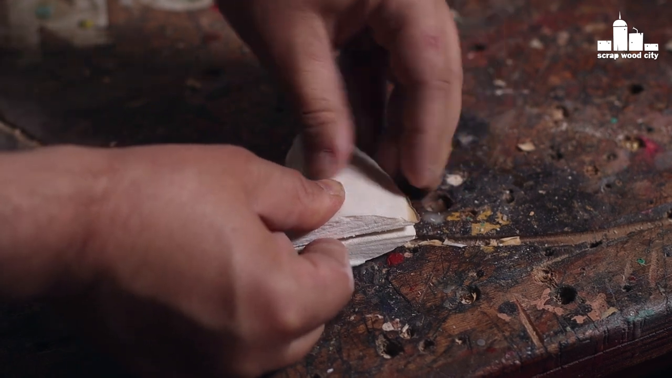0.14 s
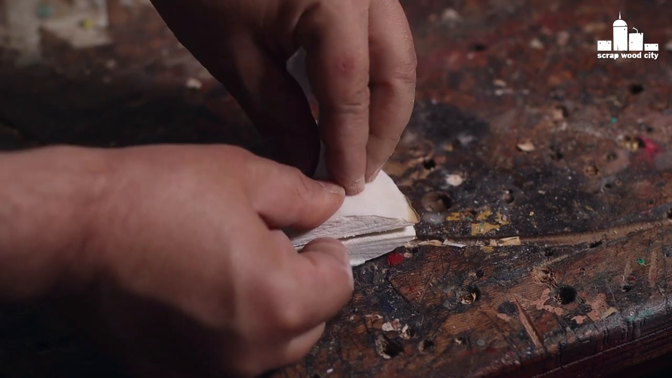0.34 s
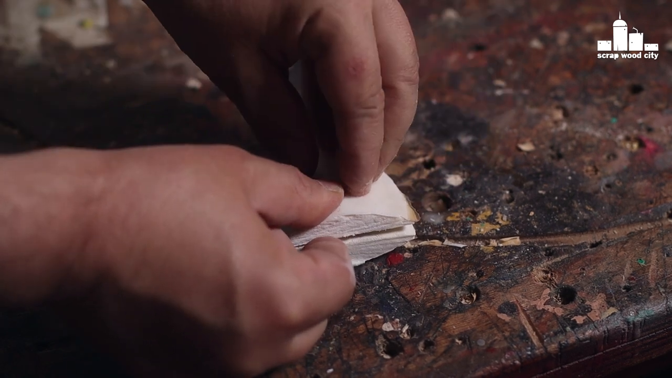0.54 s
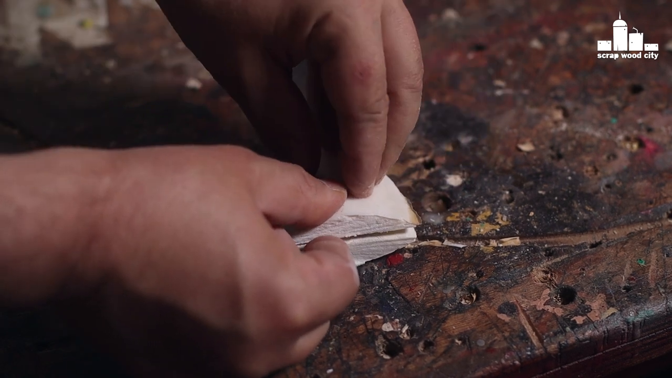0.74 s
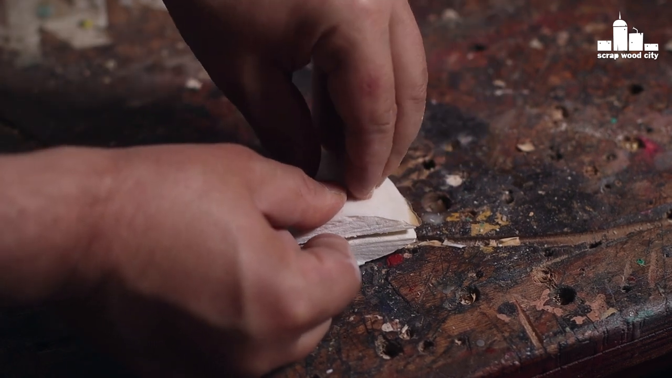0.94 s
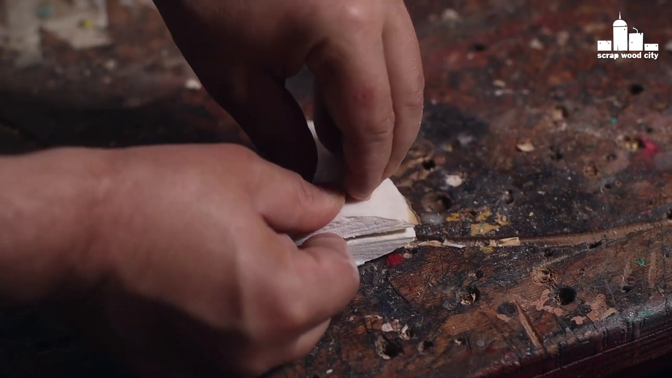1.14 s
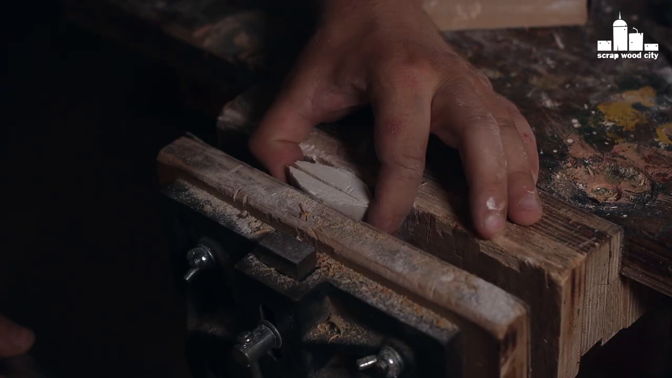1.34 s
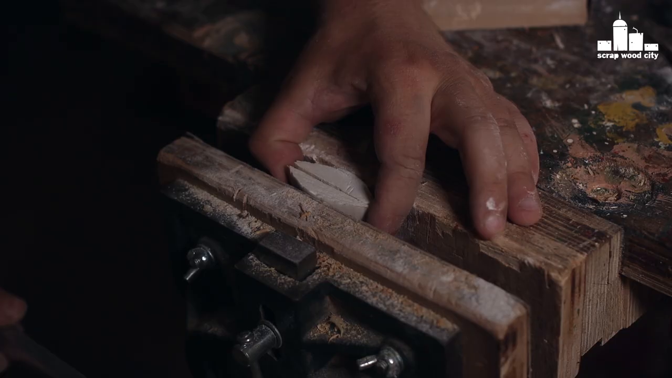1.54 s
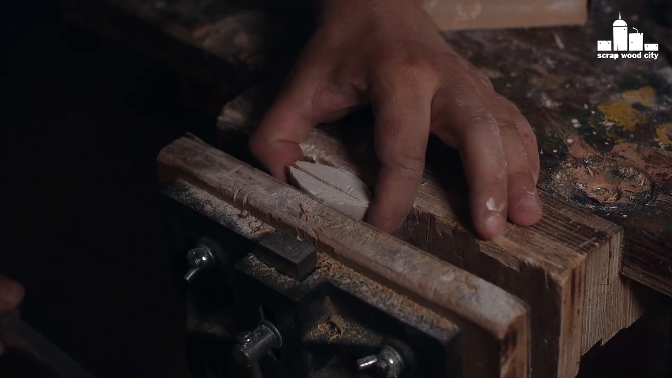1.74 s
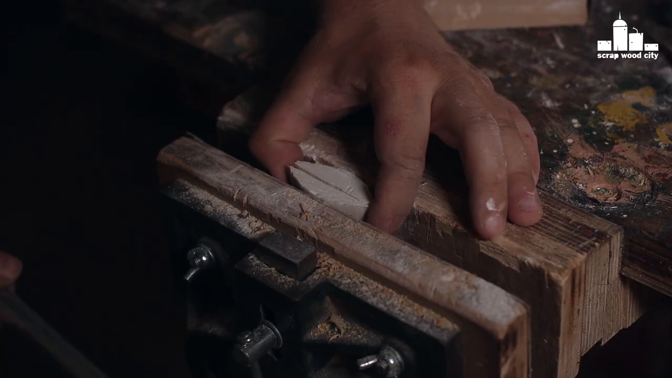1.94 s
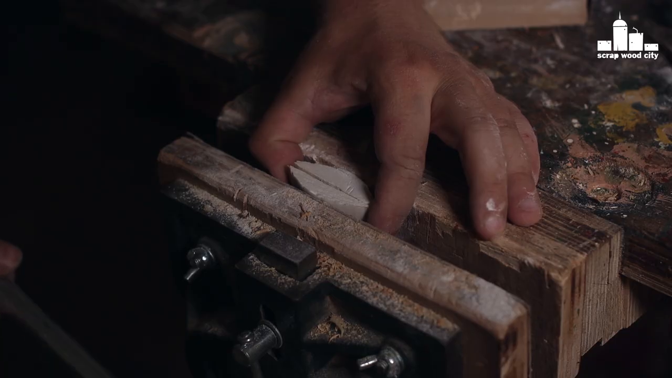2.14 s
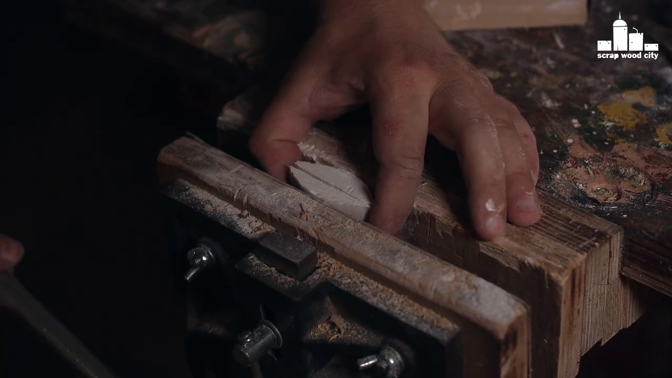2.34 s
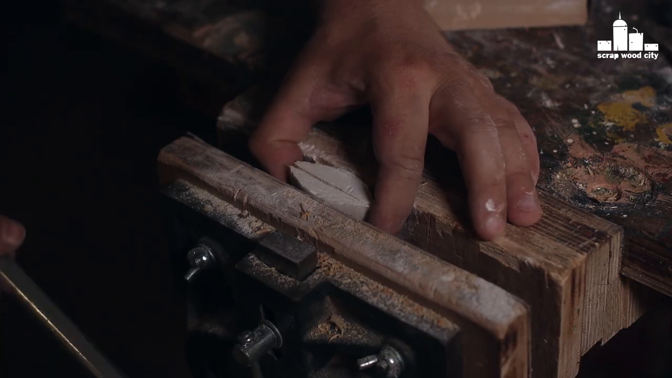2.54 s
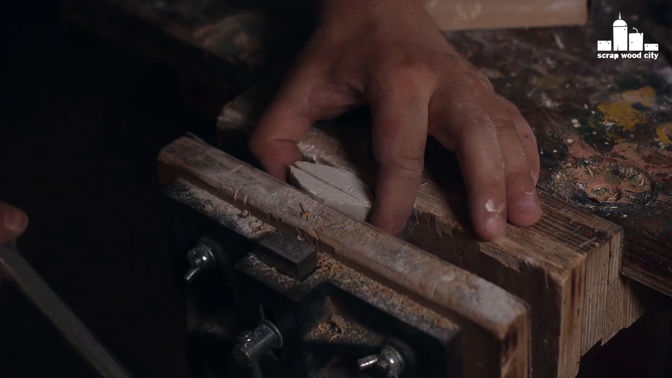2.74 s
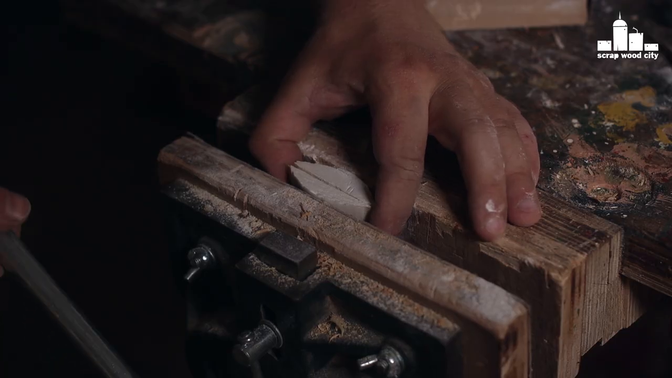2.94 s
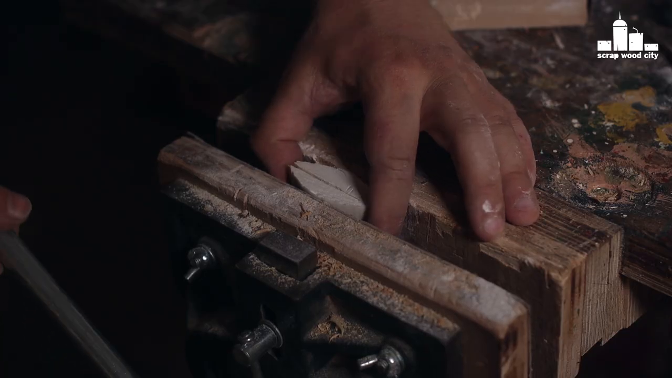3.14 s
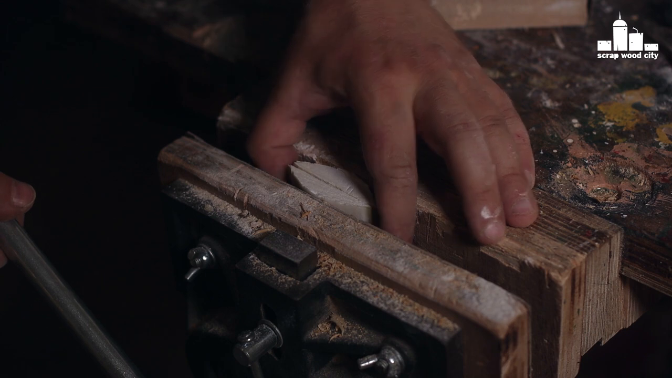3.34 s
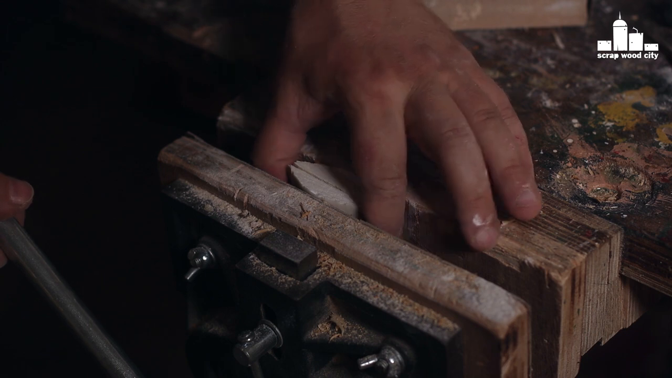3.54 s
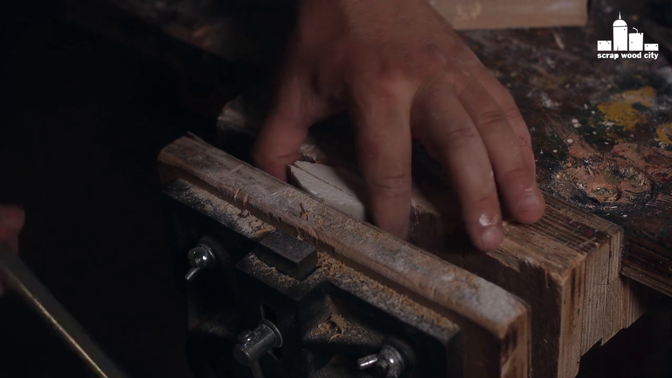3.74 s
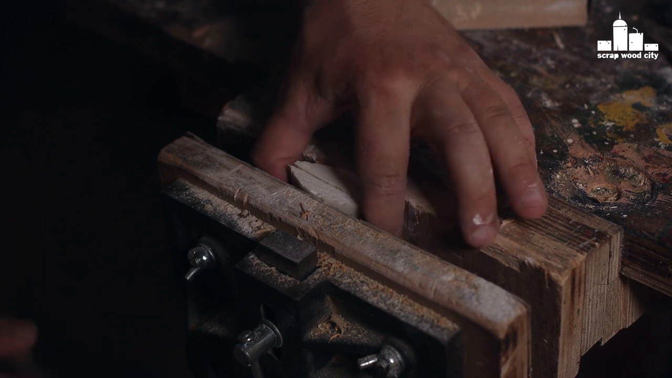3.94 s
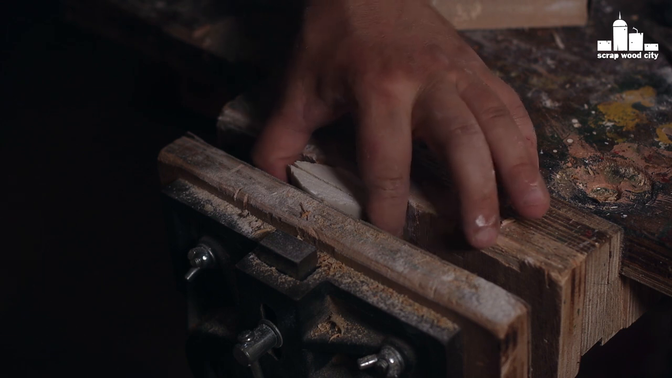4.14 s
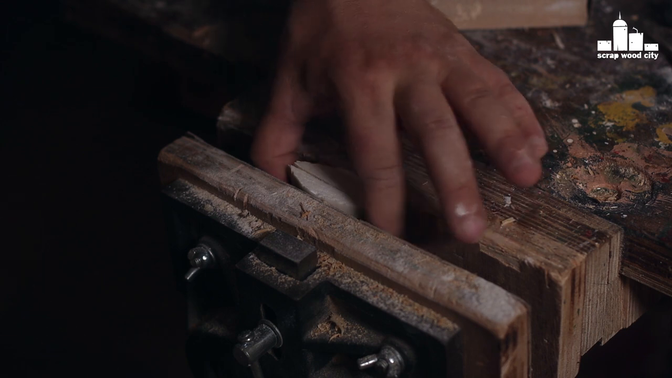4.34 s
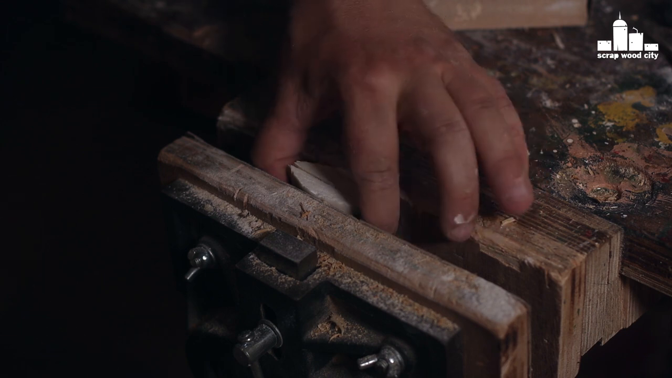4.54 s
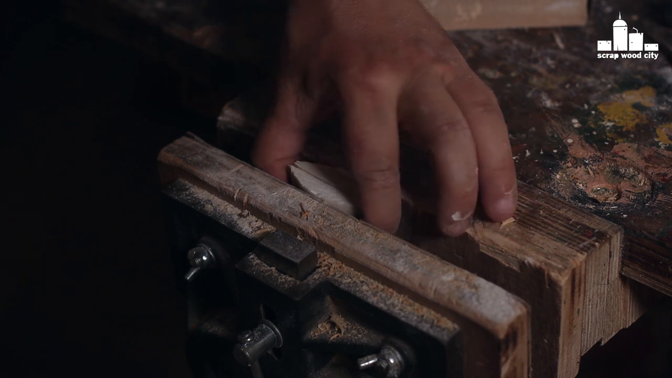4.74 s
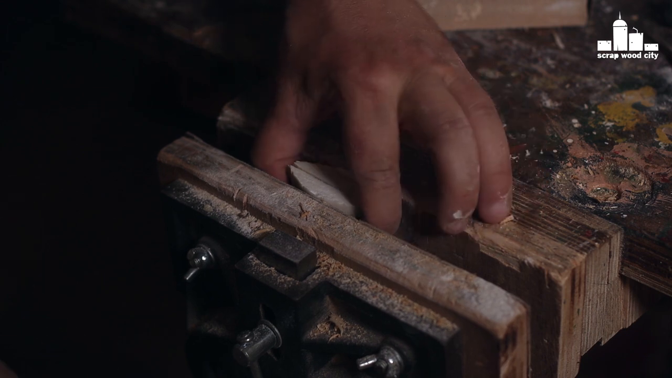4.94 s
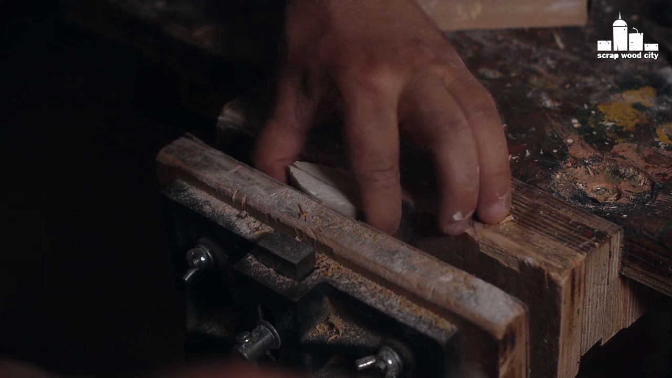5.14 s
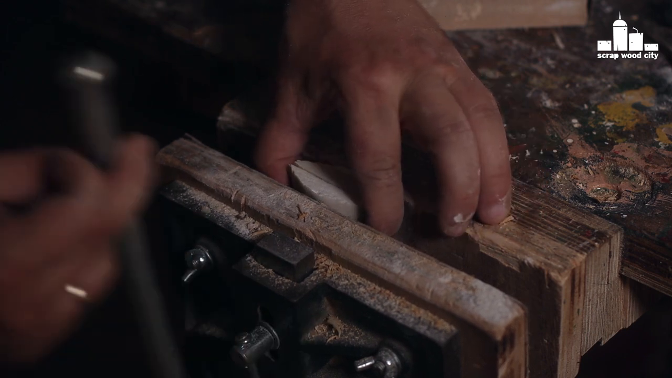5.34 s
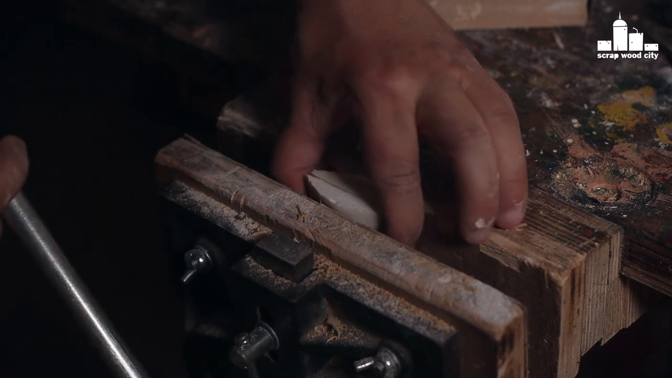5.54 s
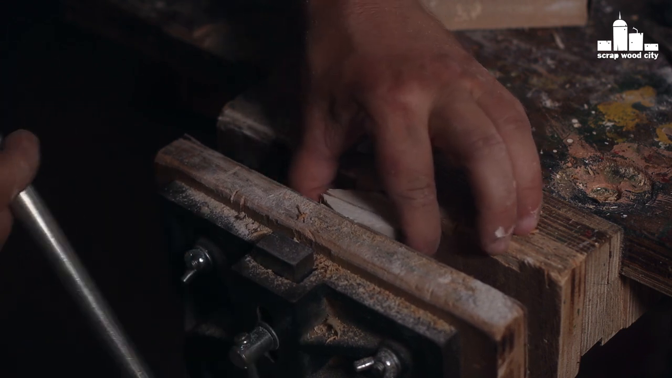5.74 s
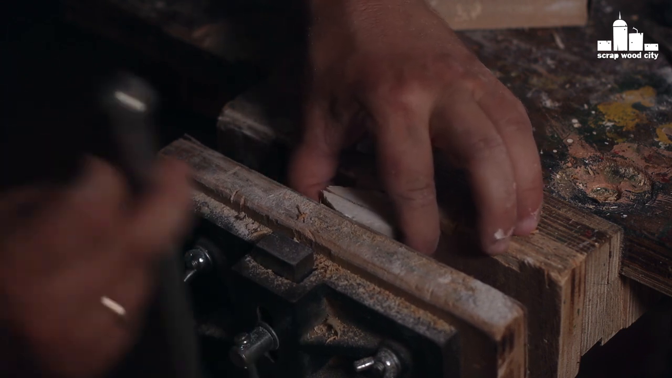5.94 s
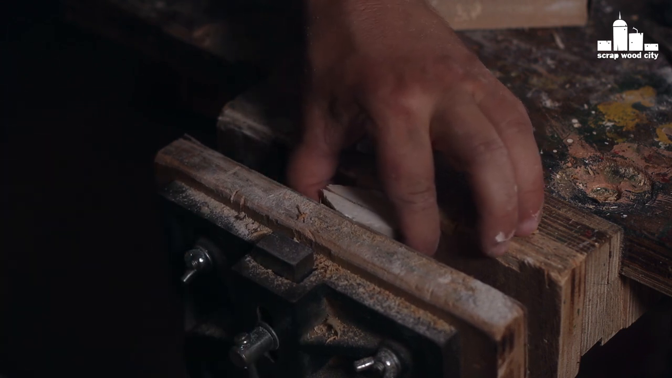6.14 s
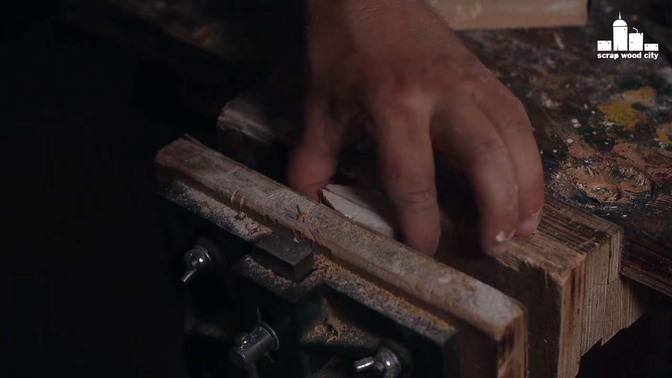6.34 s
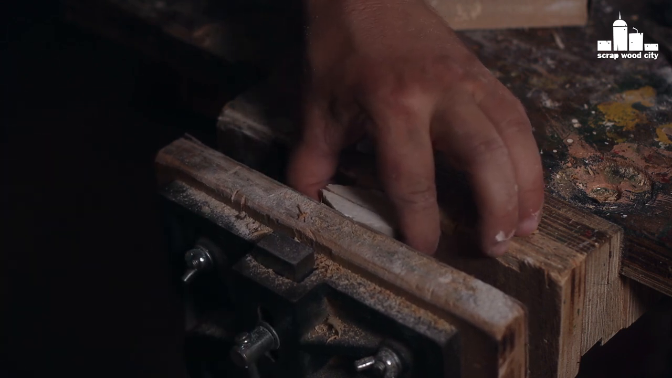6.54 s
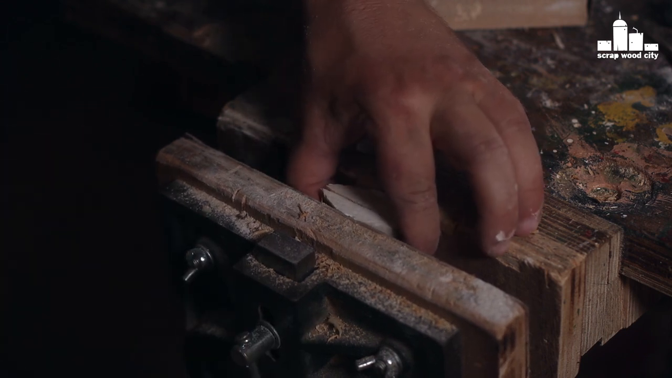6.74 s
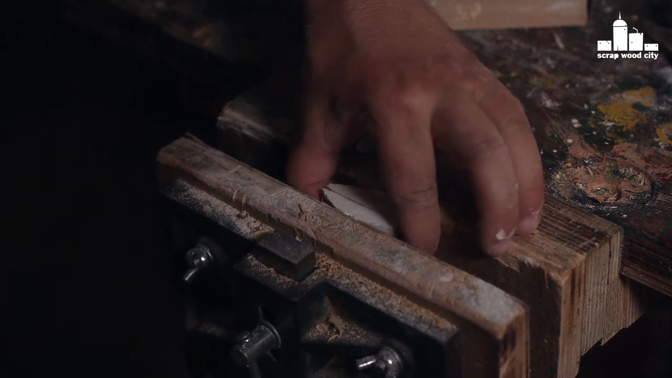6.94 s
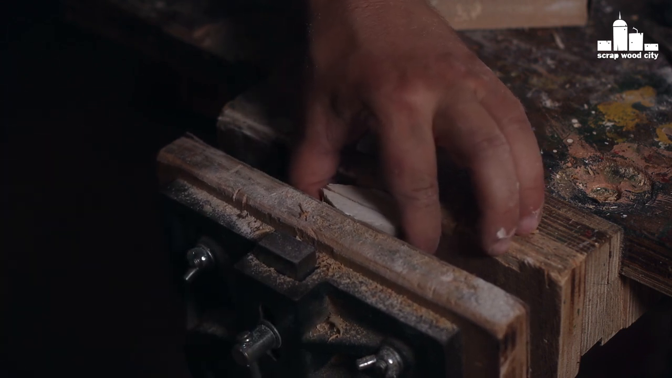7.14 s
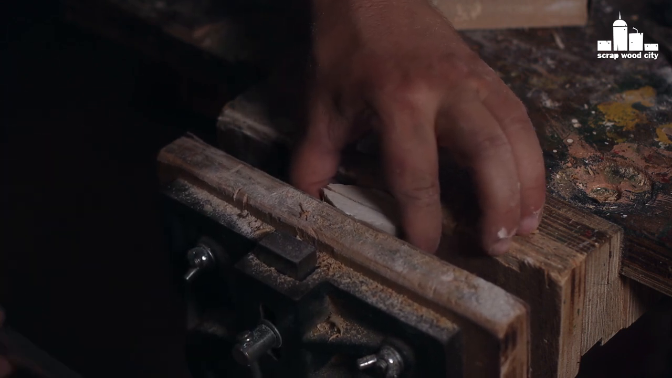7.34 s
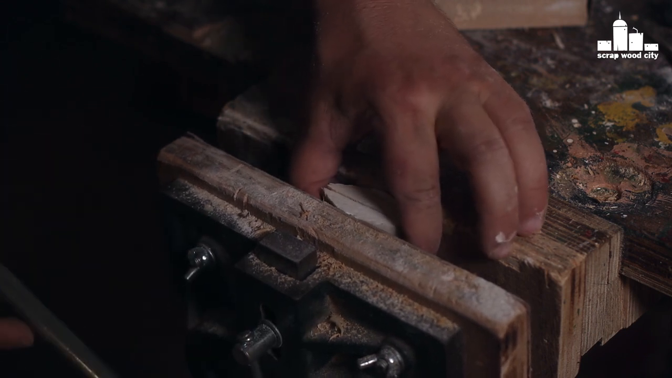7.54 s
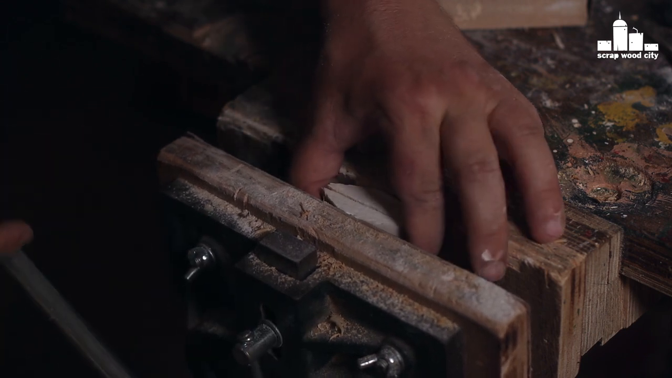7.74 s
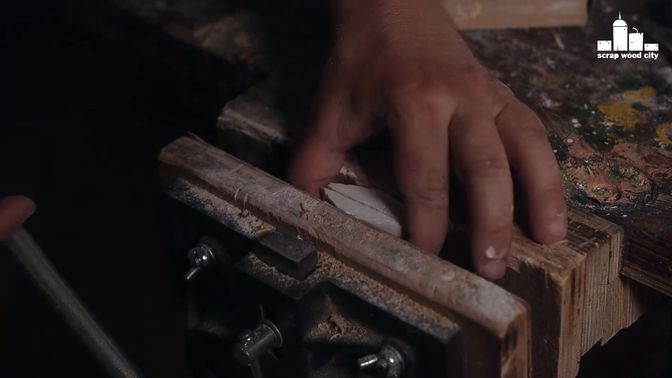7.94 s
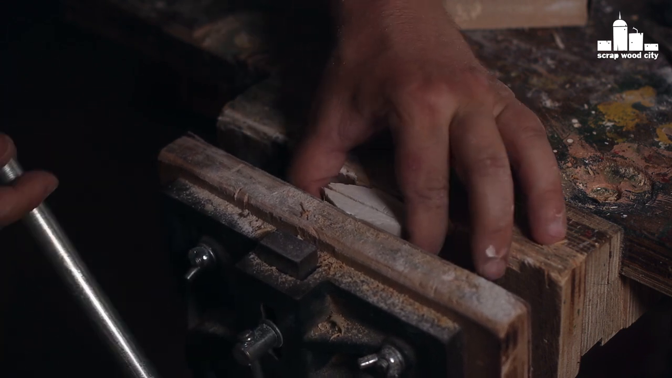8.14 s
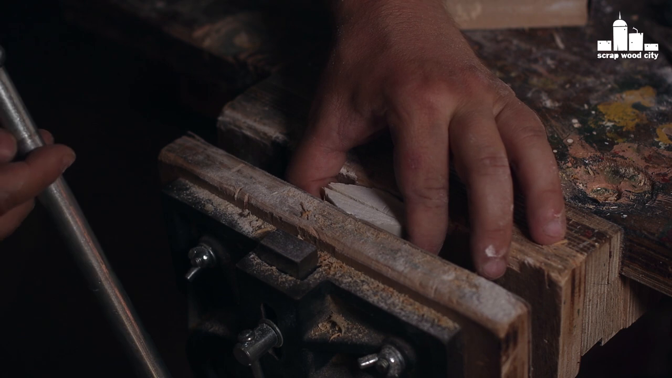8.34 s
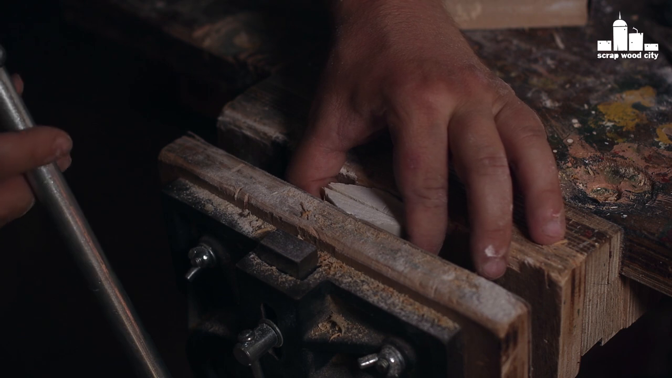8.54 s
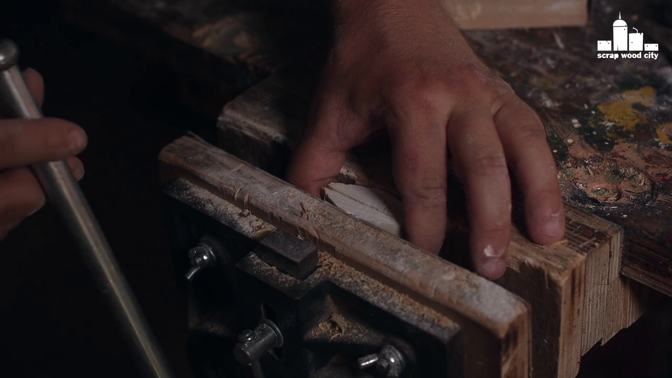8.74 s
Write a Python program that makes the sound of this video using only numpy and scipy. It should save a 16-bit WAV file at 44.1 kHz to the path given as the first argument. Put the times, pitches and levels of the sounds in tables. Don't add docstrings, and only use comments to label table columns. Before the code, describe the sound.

Close up, fingers rub a small mould with a dry, papery rasp; two crisp snaps and soft scuffs come early. Then a vise is wound: isolated steel ticks, a hard clank, a dense handle rattle with a short creaking groan, another sharp double clack, and fading knocks. Quiet hard-walled workshop, short bright reverb, faint distant traffic rumble and hiss.

```python
import sys
import numpy as np
from scipy import signal
from scipy.fft import rfft, irfft, next_fast_len
from scipy.io import wavfile
from scipy.ndimage import uniform_filter1d, map_coordinates

SR = 44100
rng = np.random.default_rng(int(sys.argv[2]) if len(sys.argv) > 2 else 0)


def pcm_store(signal):
    levels = np.round(np.clip(np.atleast_2d(signal), -1, 1) * 32767)
    wavfile.write(sys.argv[1], SR, levels.astype(np.int16).T)


def gain_from_decibels(decibels):
    exponent = np.asarray(decibels, float) / 20
    return 10 ** exponent


N = 387198


def unit(x):
    return x / np.sqrt(np.mean(x ** 2) + 1e-20)


def along(points, hz):
    f, v = np.transpose(points)
    return np.interp(np.log(hz + 1), np.log(f + 1), v)


def gains(table):
    out = np.zeros(N)
    s, db = np.transpose(table)
    span = np.arange(round(s[0] * SR), min(round(s[-1] * SR), N))
    out[span] = gain_from_decibels(np.interp(span / SR, s, db))
    return out


def swells(rows, rise, fall, slopes):
    out, t = np.zeros((len(slopes), N)), np.arange(N) / SR
    for s, hold, db, tilt_db in rows:
        span = slice(round((s - rise) * SR), round((s + hold + fall) * SR))
        before = (s - t[span]) / rise
        after = (t[span] - s - hold) / fall
        shape_db = -60 * np.maximum(np.maximum(before, after), 0)
        out[:, span] += gain_from_decibels(db + shape_db + tilt_db * np.array(slopes)[:, None])
    return out


def wobble(rate):
    knots = rng.standard_normal(int(N * rate / SR) + 4)
    return map_coordinates(knots, [np.arange(N) * rate / SR])


def filtered(x, response):
    m = next_fast_len(x.shape[-1] + 4096)
    return irfft(rfft(x, m) * response(np.fft.rfftfreq(m, 1 / SR)), m)[..., :x.shape[-1]]


def dull(hz):
    return lambda f: 1 / (1 + 1j * f / hz) ** 2


def modes(peaks, spread_db=0, widen=0.82):
    c, w, db = np.transpose(peaks)[:, :, None]
    w = w * widen
    sign = (-1.) ** np.arange(len(c))[:, None]
    strength = sign * gain_from_decibels(db + spread_db)
    return lambda f: np.sum(strength * 1j * f * w / (c * c - f * f + 1j * f * w), axis=0)


def rush(spectrum, alike, patchy_db=None):
    pair = rng.standard_normal((2, N))
    if patchy_db:
        z = signal.stft(pair, nperseg=512)[2]
        field = uniform_filter1d(rng.standard_normal(z.shape[1:]), size=6, axis=0)
        field = uniform_filter1d(field, size=12, axis=1)
        pair = signal.istft(z * gain_from_decibels(patchy_db * unit(field)), nperseg=512)[1][:, :N]

    def spread(hz):
        turn = np.arccos(np.clip(along(alike, hz), -1, 1)) / 2
        return gain_from_decibels(along(spectrum, hz)) * [np.cos(turn), np.sin(turn)]

    mid, side = filtered(pair, spread)
    return unit(np.array([mid + side, mid - side]))


# t/s, level/dB
RUMBLE_LEVEL = [(0.0, -73), (0.76, -74), (1.12, -72), (2.52, -76), (2.69, -74), (3.54, -76), (3.91, -71.5),
                (4.81, -75.5), (5.04, -70), (5.5, -74.5), (6.46, -70.5), (7.16, -76), (8.46, -74.5), (8.78, -79)]
# t/s, hold/s, level/dB, tilt/dB (unused)
PASSING_RUMBLE = [(1.0, .38, -88, 0)]
# f/Hz, level/dB per Hz
RUMBLE = [(12, -65.5), (20, -26.5), (32, -16), (59, -1.5), (87, -0.5), (107, 3.5), (124, -10), (150, -4),
          (200, -29), (330, -120)]
TONE = [(88, -42.5), (150, -1.5), (275, -2), (401, -6.5), (429, -1.5), (463, -7.5), (535, -7.5), (858, -14),
        (1500, -16.5), (1950, -38), (3300, -120)]
HISS = [(350, -39.5), (600, -32), (858, -1), (1080, -6), (1700, -3), (2400, -3), (4340, -5.5), (5630, -5.5),
        (16000, -10.5)]
# f/Hz, likeness 0..1
ALIKE = [(60, .96), (150, .95), (400, .85), (1000, .6), (2400, .25), (6000, .12), (15000, .1)]


def background():
    at_bench = np.arange(N) < 1.41 * SR
    tone = gain_from_decibels(-68.5 + 1.5 * at_bench)
    shake = gain_from_decibels(-41) * uniform_filter1d(load()[0], size=4000, origin=1500)
    low_level = gains(RUMBLE_LEVEL) * gain_from_decibels(3.0 + 1.5 * wobble(4))
    rumble = low_level + shake + swells(PASSING_RUMBLE, .3, .03, [0])[0]
    steady = tone * rush(TONE, ALIKE, patchy_db=1.06) + gain_from_decibels(-70) * rush(HISS, ALIKE)
    return rumble * rush(RUMBLE, ALIKE) + steady


# f/Hz, time/s
WALLS = [(150, 0.6), (500, 0.51), (1000, 0.55), (3000, 0.46), (6000, 0.44), (12000, 0.28)]
# f/Hz, level/dB
WALL_SIDE = [(200, -34), (500, -20), (1000, -13), (2500, -9), (5000, -5), (12000, -1)]
# t/s, level/dB
ECHOES = [(.0052, 0), (.008, -4), (0.0097, -3.5), (0.014, -7), (.018, -11.5), (0.022, -5.5)]


def workshop(x, tail_db, echo_db):
    out, step = np.zeros((2, N + 2 * SR)), SR // 3
    for start in range(0, N, step):
        if abs(x[start:start + step]).max() < 1e-5:
            continue
        noise, signs = rng.standard_normal((2, SR // 2)), rng.standard_normal((len(ECHOES), 3))
        hz, t, z = signal.stft(noise, SR, nperseg=256)
        z = z * gain_from_decibels(-60 * t / along(WALLS, hz)[:, None]) * (1 - np.exp(-t / 0.00043))
        z[1] *= gain_from_decibels(along(WALL_SIDE, hz))[:, None]
        mid, side = signal.istft(z, SR, nperseg=256)[1]
        answer = gain_from_decibels(tail_db) * np.array([mid + side, mid - side]) / np.linalg.norm(mid)
        answer[:, 0] += 1
        for (s, db), draw in zip(ECHOES, signs):
            answer[:, round(s * SR)] += gain_from_decibels(db + echo_db) * (np.sign(draw[0]) + .08 * draw[1:])
        wet = signal.fftconvolve(x[None, start:start + step], answer, axes=1)
        out[:, start:start + wet.shape[1]] += wet
    return out[:, :N]


# t/s, level/dB
RUB = [(0, -65), (.184, -57.5), (.34, -63), (1.17, -65), (1.41, -65)]
# t/s, hold/s, rasp level/dB, fizz over rasp level/dB
SLIDES = [(5.32, 1, -66.5, -14), (5.45, 0.1, -98, 18), (5.6, 0.14, -73, 12.5), (5.79, .02, -62, -5),
          (7.63, 0.16, -68, -8)]
# t/s, f/Hz
HOLLOW = [(0, 2896), (0.099, 2400), (0.169, 2900), (0.25, 2343), (0.401, 2800), (0.556, 2704),
          (0.594, 2602), (0.77, 2875), (0.95, 2570), (1.048, 2950), (1.274, 2490), (1.41, 2760)]
# f/Hz, level/dB per Hz
RASP = [(350, -39), (600, -13), (795, -11), (867, -2.5), (926, -6), (1320, -7), (1680, -7), (1830, -5.5),
        (2180, -4.5), (2590, -4.5), (4180, -7.5), (8000, -25.5), (10400, -54), (17600, -120)]
FIZZ = [(2940, -34), (5000, -8), (7310, -11), (8610, -6), (12100, -5), (14700, -4), (15800, -12)]
SCRAPE = [(240, -33), (400, -11), (532, -4.5), (610, -11), (671, -11), (1060, -8.5), (5000, -22.5),
          (6500, -46), (11000, -120)]


def hands():
    grain = unit(gain_from_decibels(1.53 * wobble(240)))
    rasp = gains(RUB)
    fizz = gain_from_decibels(-12) * rasp.max() * (rasp / rasp.max()) ** 1.4
    scrape, slide = swells(SLIDES, 0.14, 0.14, [0, 1])
    pitch = np.interp(np.arange(N) / SR, *np.transpose(HOLLOW))
    width_hz = 300
    blur = np.cumsum(rng.standard_normal(N)) * np.sqrt(2 * np.pi * width_hz / SR)
    hollow = gain_from_decibels(-4.5 + 3.8 * wobble(11.93)) * np.sin(2 * np.pi * np.cumsum(pitch) / SR + blur)
    skin = rasp * (rush(RASP, [(1000, 0.88), (6000, 0.51)], patchy_db=1.5) + hollow)
    skin = skin + (fizz + slide) * rush(FIZZ, [(8000, 0.25)])
    return grain * (skin + scrape * rush(SCRAPE, [(1000, 0.8)]))


# f/Hz, width/Hz, level/dB
FRAME = [(520, 15, 12), (775, 35, 8.5), (1070, 34, -10), (1650, 74, 2.5), (2037, 82, 6), (2220, 360, 5),
         (2690, 180, 1)]
# f/Hz, width/Hz, level/dB
BAR = [(2850, 15, -14), (3540, 17, -16), (4130, 41, -22), (4650, 15, -21), (5200, 43, -20), (5500, 72, -18)]
# f/Hz, width/Hz, level/dB
BLOCK = [(218, 38, -3), (326, 20, -13.5), (524, 158, -2.5), (765, 200, -6), (1050, 346, -2.5)]


def contacts(events, grit, length, breadth, edge_hz, ring_db, trim_db):
    out, t = np.zeros(N + SR), np.arange(SR // 12) / SR
    steel = np.array(FRAME + BAR)

    def band(hz, width):
        return lambda f: modes([(hz, hz * width, 0)])(f) ** 2 * dull(2.2 * hz)(f)

    for s, db, hz, thud_db, edge_db in events:
        blow = grit * rng.standard_normal(len(t)) * gain_from_decibels(-60 * t / length) * (1 - np.exp(-t / 0.001192))
        blow[0] += 1
        ring_spread = rng.normal(0, 1.2, (len(steel), 1)) - 9 * abs(np.log2(steel[:, :1] / hz))
        ring = modes(steel, ring_spread, widen=3.8)
        thud = modes(BLOCK, rng.normal(0, 2.24, (len(BLOCK), 1)))
        parts = filtered(blow, lambda f: np.array([
            band(hz, breadth)(f), ring(f) * dull(3 * hz)(f), thud(f) * dull(1900)(f), band(edge_hz, .9)(f)]))
        levels = gain_from_decibels(db + trim_db + np.array([0, ring_db, thud_db, edge_db]))
        out[round(s * SR):][:len(t)] += (levels / abs(parts).max(axis=1)) @ parts
    return out[:N]


# t/s, peak level/dB, contact f/Hz, thud level/dB, edge level/dB
SCUFFS = [(.265, -43.5, 2900, 0, -10), (.49, -51, 2740, -19, -11), (.582, -50, 11100, -34, -2),
          (.61, -45, 867, 7.5, -3.5), (.69, -51, 3850, -30, -20), (.832, -56, 4410, -32, -29),
          (1.335, -54, 5500, -25, -19), (3.691, -57, 596, 10, -33)]


def scuffs():
    return contacts(SCUFFS, grit=0.58, length=0.15, breadth=0.32, edge_hz=8600, ring_db=-4.0, trim_db=-8.0)


# t/s, peak level/dB, contact f/Hz, thud level/dB, edge
# level/dB
SNAPS = [(0.0695, -26, 10300, -44, -9), (0.0745, -32, 11100, -12, -3), (0.19, -21.5, 8050, -34, -25),
         (0.1945, -27, 11700, -16.5, -13), (0.199, -39, 8950, -8, -17), (0.079, -40, 9000, -22, 4),
         (3.4448, -40.5, 8500, -19, -4), (3.5404, -44.5, 6840, -13, -1), (4.3294, -57, 8600, -7, 8.5),
         (4.472, -50, 10000, -8, -17), (7.5943, -43, 10730, -30.5, 2), (7.597, -50, 2520, -22, -4),
         (8.029, -52, 10800, -20, -20)]


def snaps():
    return contacts(SNAPS, grit=.45, length=.007, breadth=.5, edge_hz=3800, ring_db=-30, trim_db=-3.5)


def fingers():
    louder_db, lead_s = 0.9, 1.6e-5
    sides = np.array([[.5], [-.5]])
    aside = lambda f: gain_from_decibels(louder_db * sides) * np.exp(2j * np.pi * f * lead_s * sides)
    return filtered(workshop(snaps() + scuffs(), tail_db=-7.5, echo_db=-6.0) + hands(), aside)


# t/s, hold/s, level/dB, tilt/dB (unused)
HUMS = [(4.795, 0.047, -39, 0), (4.885, 0.025, -35.5, 0), (4.925, 0.046, -29, 0), (5.025, 0.048, -35, 0),
        (5.845, .04, -36.5, 0), (6.52, 0.044, -40, 0)]


def hum():
    phase = 2 * np.pi * np.cumsum(235 + 4 * wobble(25)) / SR
    return swells(HUMS, 0.035, 0.29, [0])[0] * gain_from_decibels(1.7 * wobble(40)) * np.sin(phase)


def pings(rows, wander_hz):
    out, t = np.zeros(N + SR), np.arange(SR // 2) / SR
    for s, hz, db, t60 in rows:
        drift = np.cumsum(rng.standard_normal(len(t))) * np.sqrt(2 * np.pi * wander_hz / SR)
        fade = gain_from_decibels(db - 60 * t / t60) * (1 - np.exp(-t / 0.00064))
        out[round(s * SR):][:len(t)] += fade * np.sin(2 * np.pi * hz * t + drift)
    return out[:N]


# t/s, f/Hz, level/dB, time to fade 60 dB/s
PINGS = [(.07, 10400, -41, 0.04), (.07, 8800, -45, 0.035), (.19, 7100, -46.5, 0.067),
         (.19, 10100, -44, 0.026), (.832, 4380, -58.5, 0.35), (1.532, 4430, -59.5, 0.13),
         (2.488, 4300, -54.5, 0.15), (3.724, 1720, -43.5, 0.045), (3.757, 4670, -45, 0.044),
         (4.04, 958, -36.5, 0.14), (4.04, 1370, -49, 0.025), (4.04, 2530, -59, 0.34),
         (4.04, 5570, -62, .068), (4.254, 1163, -45.5, 0.019), (4.895, 5500, -49, 0.26),
         (4.895, 8960, -35, 0.013), (4.91, 7780, -48, .11), (4.912, 10330, -59, 0.58),
         (4.915, 3505, -38.5, 0.27), (4.935, 3770, -39, 0.14), (1.533, 4720, -62, .15),
         (2.488, 4660, -60, 0.16), (1.535, 1140, -53, 0.036), (.075, 4700, -47, .03), (.27, 530, -54, .08),
         (3.55, 9500, -55, .02), (3.541, 2100, -56, .03), (5.0, 7780, -49.5, .17), (5.47, 1050, -69, 0.76),
         (5.904, 3070, -27, 0.028), (6.313, 3940, -50.5, 0.078), (6.466, 3605, -41, 0.053),
         (6.466, 4970, -49, 0.12), (6.466, 8400, -57, 0.049), (1.533, 2074, -53, 0.046),
         (2.488, 2070, -46.5, 0.033), (8.029, 1290, -57.5, 0.039), (8.029, 4280, -66, 0.088)]
# t/s, f/Hz, level/dB, time to fade 60 dB/s
CHIMES = [(4.04, 2100, -37.5, .12), (4.04, 1600, -38, .1), (4.042, 2300, -46, .35), (.612, 276, -55, .1),
          (.612, 610, -57, 0.056), (6.467, 4950, -48, .08), (3.762, 376, -43, 0.17),
          (3.762, 670, -42.5, .08), (6.315, 1900, -38.5, .04), (5.85, 330, -46, .1),
          (6.33, 330, -43.5, 0.15), (2.487, 1200, -52, 0.043), (4.877, 1510, -34.5, 0.052),
          (4.925, 13130, -64, .43), (5.0, 12200, -58, 0.37), (5.79, 1950, -40, 0.046),
          (5.79, 5260, -56.5, 0.1), (5.825, 1560, -30, 0.03), (4.79, 1070, -43, 0.085),
          (4.82, 1150, -37, 0.043), (6.313, 1680, -37, 0.024), (6.47, 1030, -47, 0.17),
          (5.047, 1070, -50, 0.066)]


def ringing_steel():
    return pings(PINGS, wander_hz=233) + pings(CHIMES, wander_hz=45)


# t/s, peak level/dB, contact f/Hz, thud level/dB, edge level/dB
TICKS = [(1.5324, -33.5, 4100, -18, -46), (2.4876, -28.5, 4260, -15.5, -3.5), (2.8898, -50, 4260, -13, 7.5),
         (3.4694, -45.5, 5330, -6.5, -12), (4.8755, -30.5, 2970, -1, -8), (5.903, -15, 3440, -16.5, -18),
         (6.1994, -47.5, 2950, -0.5, -1), (6.465, -29, 3690, -3, -32), (8.029, -53, 4380, -5, -13),
         (8.3105, -53, 4020, -12, -11)]


def ticks():
    return contacts(TICKS, grit=0.117, length=0.024, breadth=.8, edge_hz=9800, ring_db=-14.5, trim_db=-2.0)


# t/s, peak level/dB, contact f/Hz
CLATTER = [(3.766, -34, 774), (3.779, -37, 890), (4.056, -26, 2530), (4.064, -24, 1500),
           (4.827, -31.5, 1070), (4.834, -41, 1100), (4.879, -29, 1570), (4.887, -28, 1570),
           (4.899, -31, 1190), (4.906, -33, 1500), (4.912, -27.5, 1050), (4.918, -27, 3570),
           (4.924, -25, 1090), (4.931, -22.5, 900), (4.935, -23.5, 1300), (4.941, -25, 1070),
           (4.946, -23, 1610), (4.951, -29, 1410), (4.961, -30, 1090), (4.965, -27, 3470),
           (4.972, -36, 1200), (4.984, -18.5, 2320), (4.992, -24, 2980), (4.998, -28, 1170),
           (5.008, -26, 1200), (5.011, -19, 3000), (5.015, -27.5, 1120), (5.021, -32, 1510),
           (5.028, -35, 2500), (5.033, -30.5, 990), (5.044, -27.5, 2600), (5.0493, -21.5, 1290),
           (5.056, -34, 1500), (5.064, -30.5, 1100), (5.07, -39, 1500), (5.078, -37, 1080),
           (5.096, -43, 1200), (5.1275, -41, 1280), (5.796, -37, 1800), (5.833, -27, 950),
           (5.9048, -15, 3670), (5.9065, -19, 2300), (5.9095, -15.5, 2800), (5.9133, -18.5, 3000),
           (5.918, -21.5, 3250), (5.923, -29, 2800), (5.927, -26, 1490), (5.934, -26, 1440),
           (6.32, -28, 1520), (6.328, -35, 1420), (6.335, -30, 880), (6.34, -41, 890), (6.468, -35.5, 1120),
           (6.472, -31.5, 3650), (6.475, -37, 1000), (6.48, -39, 3600)]


def clatter():
    thud_db, edge_db = -11.5, -18
    blows = [(*row, thud_db, edge_db) for row in CLATTER]
    return contacts(blows, grit=.05, length=.01, breadth=0.7, edge_hz=5800, ring_db=-11.5, trim_db=-2.5)


# t/s, peak level/dB, contact f/Hz, jaw thud level/dB, steel edge level/dB
KNOCKS = [(3.139, -56.5, 1710, -16, -22), (3.722, -41, 925, 0, -30), (3.757, -25, 693, -7, -0.5),
          (3.77, -41, 666, -22, -19), (3.808, -27, 1700, -10, -31), (3.839, -52, 720, -6, -27),
          (3.867, -31, 765, -2, -33), (4.037, -19, 2200, -19, -56), (4.0405, -12.5, 2290, -7.5, 0),
          (4.252, -54, 979, -17, -14), (4.788, -46.5, 1070, 2, -26), (4.819, -40, 1070, 13, -33),
          (4.875, -37, 1594, -4, -41), (5.735, -40.5, 714, 6, -24), (5.788, -42, 1820, 9, -23),
          (5.825, -33, 1580, -2, -30), (5.857, -41.5, 975, 13.5, -32), (6.313, -22.5, 1682, -4, -42),
          (6.332, -28, 660, -14, -40), (6.518, -52, 1020, 18.5, -34)]


def knocks():
    return contacts(KNOCKS, grit=0.13, length=0.026, breadth=0.52, edge_hz=4770, ring_db=-13.5, trim_db=-4.5)


# t/s, hold/s, load level/dB, grind of steel against wood level/dB
PUSHES = [(3.722, 0.039, -37.5, -23), (3.76, 0.013, -33.5, -4), (3.82, 0.072, -41.5, -36),
          (3.94, 0.026, -47, -21), (4.06, 0.033, -44, -9), (4.255, 0.12, -51.5, -19),
          (4.795, 0.021, -34, -13), (4.82, 0.0037, -41, -1.5), (4.88, 0.03, -31.5, -6.5),
          (4.92, 0.06, -26.5, -8.5), (4.98, 0.062, -36.5, 0.5), (5.045, 0.04, -37, -18),
          (5.738, 0.072, -40.5, -25), (5.795, 0.035, -42, -8), (5.84, 0.048, -32.5, -28),
          (5.885, .012, -42, -21), (6.2, 0.13, -48.5, -11.5), (6.32, 0.016, -31, -17),
          (6.37, 0.032, -37, -20), (6.47, 0.021, -35, -17), (6.52, 0.036, -35, -19)]


def load():
    return swells(PUSHES, .01, 0.18, [0, 1, 2.1])


# t/s, rate/slips per s
SLIP_RATE = [(3.7, 290), (3.87, 325), (4.0, 325), (4.2, 236), (4.78, 236), (6.7, 232)]
# f/Hz, width/Hz, level/dB
JAW = [(155, 45, -6), (236, 40, -5), (325, 40, -4), (378, 36, -4)]


def screw():
    rate = np.interp(np.arange(N) / SR, *np.transpose(SLIP_RATE)) * (1 + .05 * wobble(40))
    slips = np.diff(np.floor(np.cumsum(rate) / SR), prepend=0)
    slips = slips * gain_from_decibels([[2.5], [4.5]] * rng.standard_normal(N))
    grit = [[1.3], [.6]] * rng.standard_normal(N)
    even, uneven = np.array([unit(row) for row in slips]) + grit

    def frame(f, shift):
        return modes(FRAME, widen=2.5)(f * shift) * dull(4500)(f)

    def part(f):
        jaw = modes(JAW)(f) * dull(700)(f)
        bar = modes(BAR, widen=6)(f) * dull(9000)(f)
        return np.array([jaw, frame(f, 1.0), frame(f, 1.04), bar])

    strength = np.sqrt(np.mean(abs(part(np.arange(1, SR / 2))) ** 2, axis=1, keepdims=True))
    # level/dB, swing/dB
    shares = [(-15.5, 2.1), (-15.5, 4), (-16, 3.8), (-15, 4)]
    lumps = np.array([gain_from_decibels(db + swing_db * wobble(35)) for db, swing_db in shares])
    jaws, cast, bars = load()
    drive = lumps * [even * jaws, uneven * cast, uneven * cast, uneven * bars]
    return filtered(drive / strength, part).sum(axis=0)


def vise():
    struck = knocks() + clatter() + ticks() + ringing_steel() + gain_from_decibels(-4.5) * screw()
    low_hz = 116
    thin = lambda f: 1 - dull(low_hz)(f) * (1 + 2j * f / low_hz)
    struck = filtered(struck, lambda f: thin(f) * dull(14700)(f))
    return workshop(struck, tail_db=-.5, echo_db=-6.5) * gain_from_decibels([[-.3], [.3]])


def scene():
    return background() + fingers() + hum() + vise()


def low_pass(x):
    return signal.sosfilt(signal.butter(12, 16670, fs=SR, output="sos"), x)


def record(dry):
    mix = filtered(dry, lambda hz: hz < 15780)
    return low_pass(mix)


dry = scene()
out = record(dry)
pcm_store(out)
```